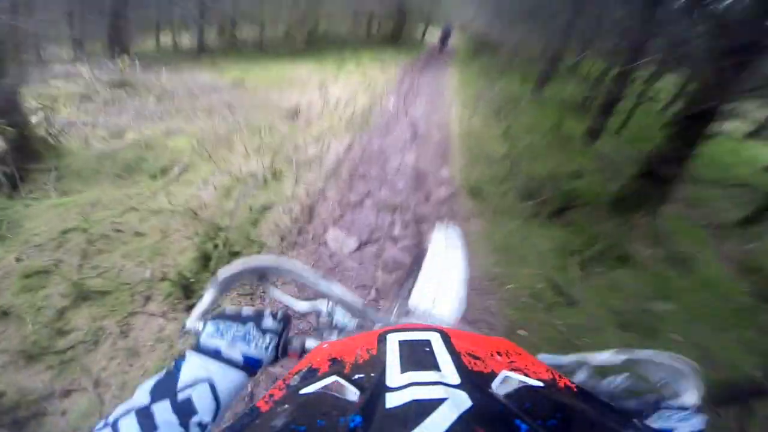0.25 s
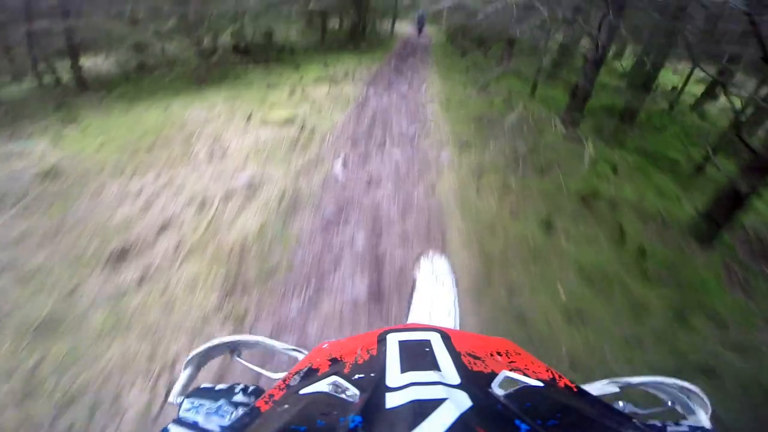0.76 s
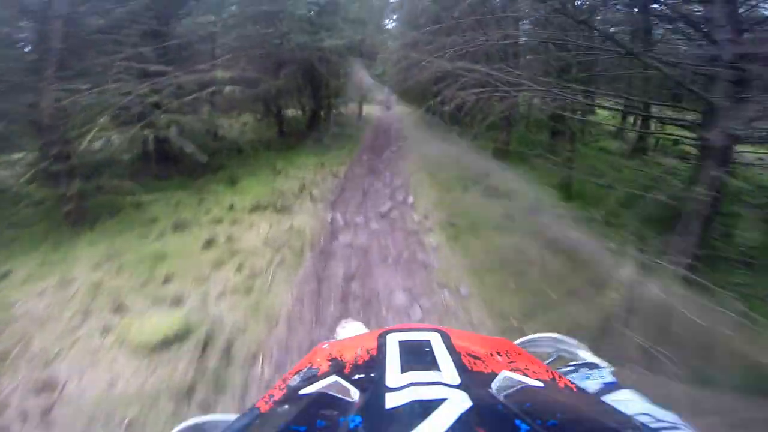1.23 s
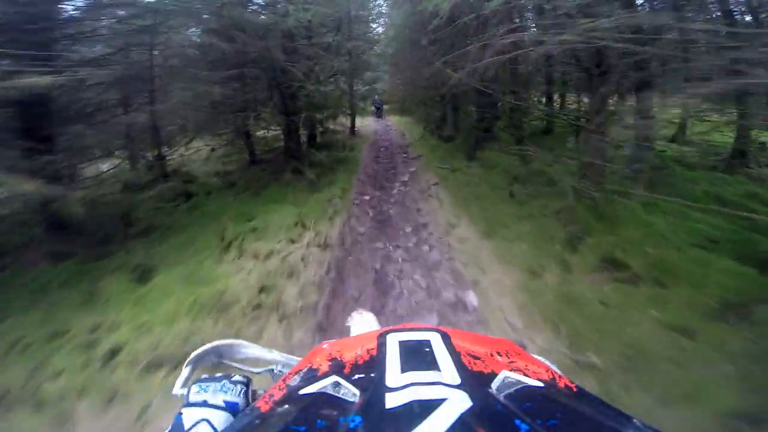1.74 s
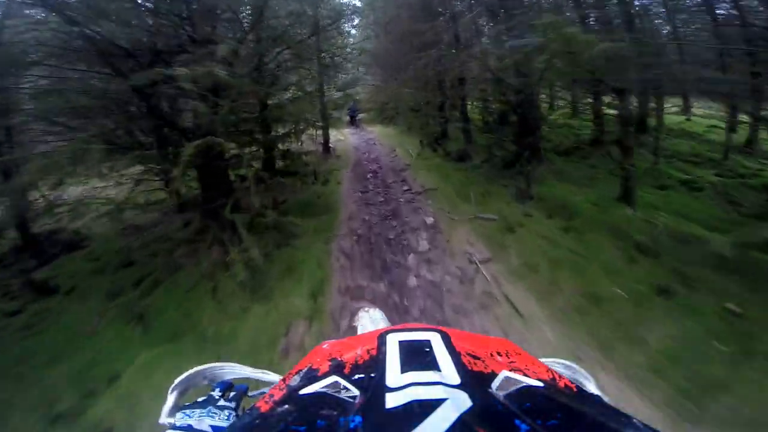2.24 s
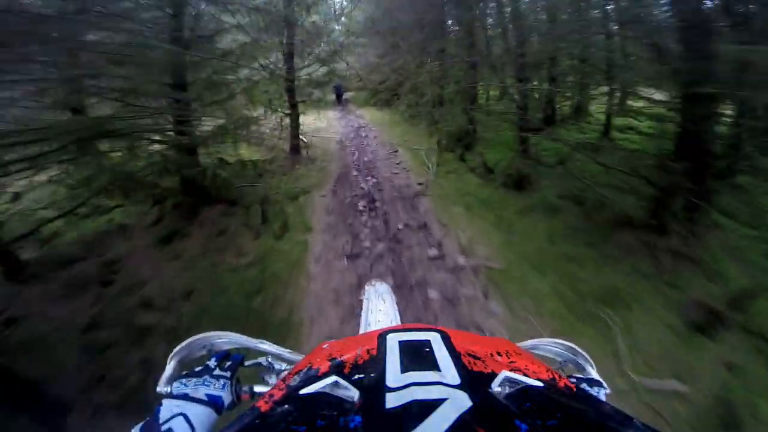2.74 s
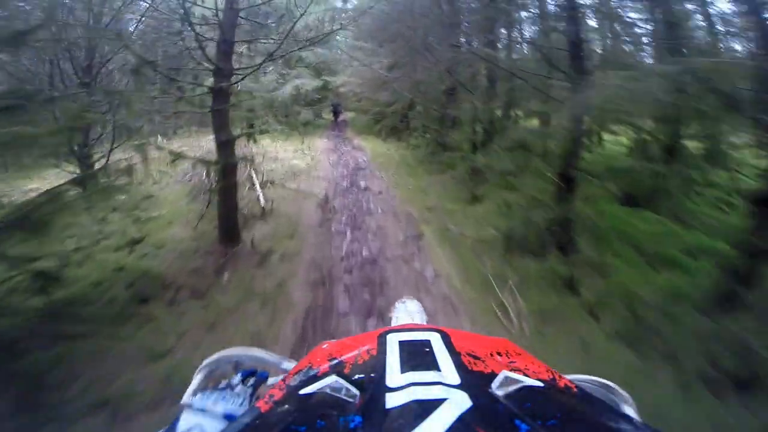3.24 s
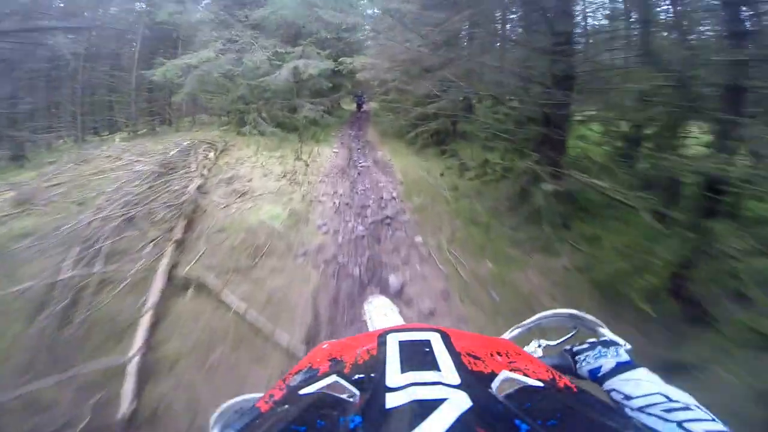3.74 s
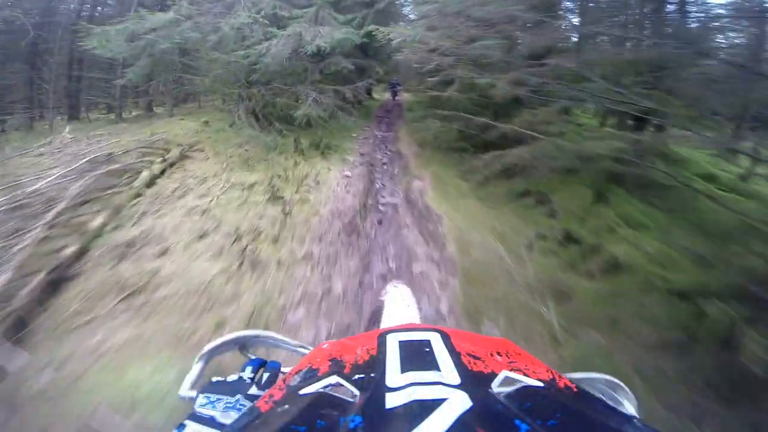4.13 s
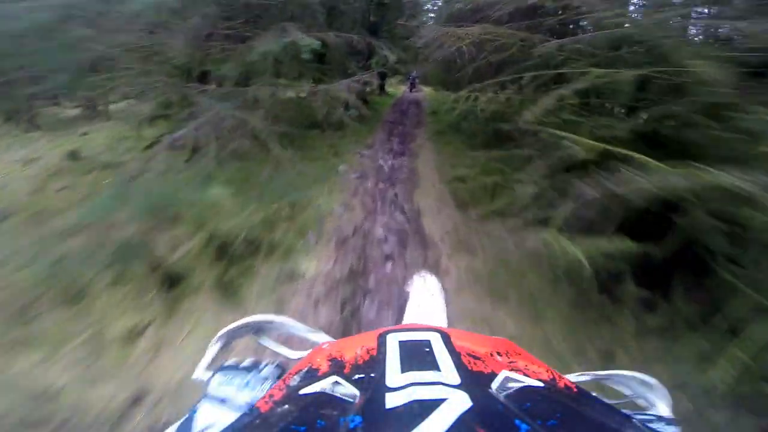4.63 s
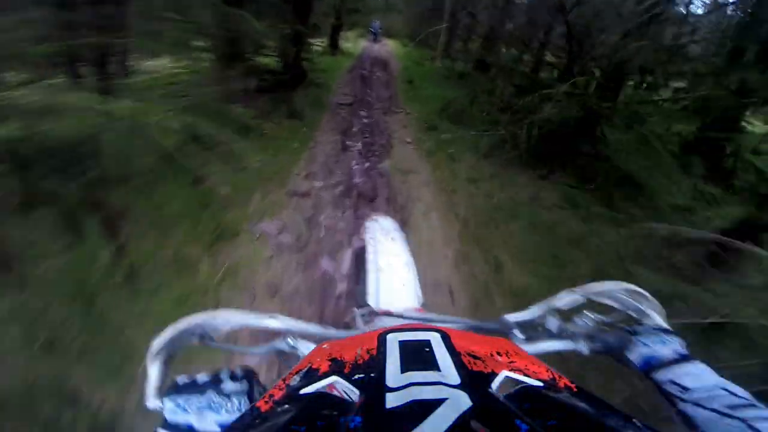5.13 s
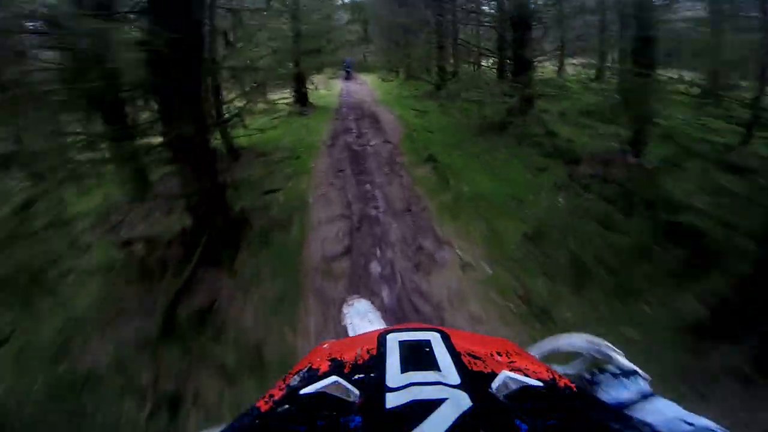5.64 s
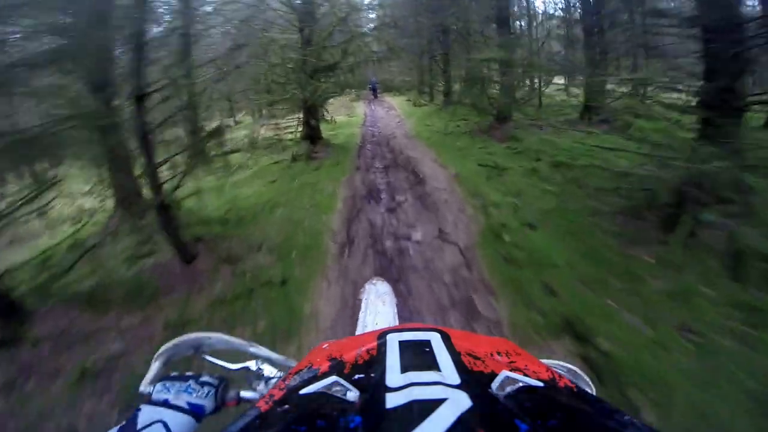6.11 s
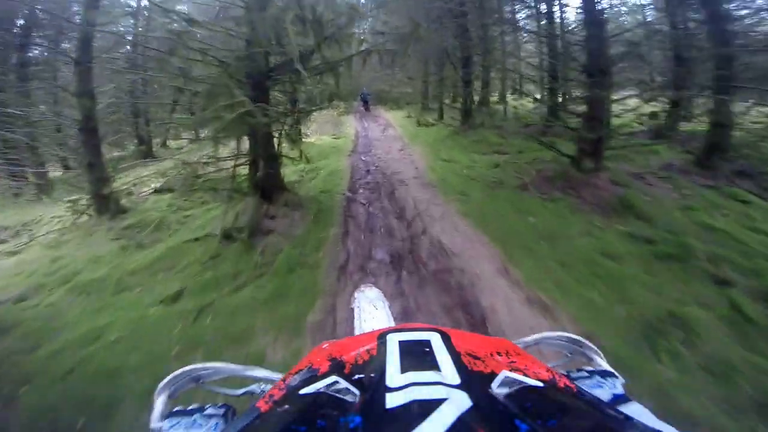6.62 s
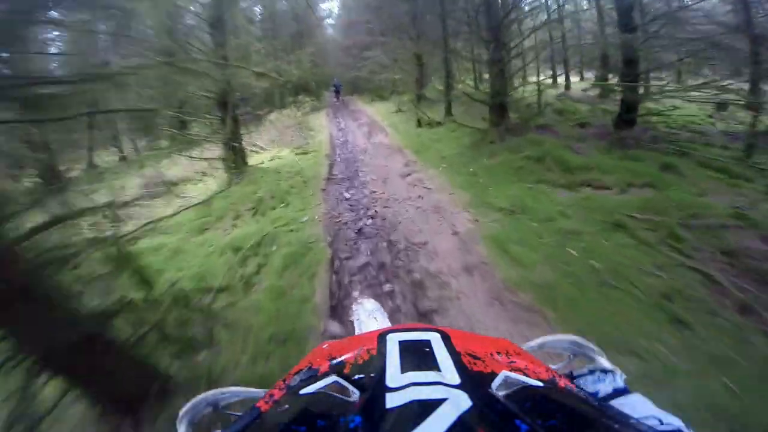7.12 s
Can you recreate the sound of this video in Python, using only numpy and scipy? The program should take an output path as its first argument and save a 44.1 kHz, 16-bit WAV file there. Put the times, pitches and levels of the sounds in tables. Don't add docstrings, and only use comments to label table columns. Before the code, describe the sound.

Muffled off-road motorbike engine surging over rough ground, air rushing, while branches whip, scrape and knock the helmet beside the microphone.

```python
import sys
import numpy as np
from scipy import signal
from scipy.fft import rfft, irfft, next_fast_len
from scipy.io import wavfile
from scipy.ndimage import uniform_filter1d, map_coordinates

SR = 44100
rng = np.random.default_rng(int(sys.argv[2]) if len(sys.argv) > 2 else 0)


def unload_wav(signal):
    wavfile.write(
        sys.argv[1],
        SR,
        np.round(np.clip(np.atleast_2d(signal).T, -1, 1) * 32767).astype(np.int16),
    )


def voltage_ratio(decibels):
    exponent = np.asarray(decibels, float) / 20
    return 10 ** exponent


N = 325017

# frequency in Hz, gain in dB.
MUFFLE = [(900, -10), (4000, -13), (16000, -76)]
COAST_FROM_S, COAST_TO_S = 4.96, 5.62


def unit(x):
    return x / np.sqrt(np.mean(x ** 2) + 1e-20)


def along(points, hz):
    f, v = np.transpose(points)
    return np.interp(np.log(hz + 1), np.log(f + 1), v)


def curves(rows):
    s, *cols = np.transpose(rows)
    return [np.interp(np.arange(N) / SR, s, c) for c in cols]


def wobble(rate_hz):
    knots = rng.standard_normal(int(N * rate_hz / SR) + 4)
    return map_coordinates(knots, [np.arange(N) * rate_hz / SR])


def swell(s, half_s):
    return np.exp(-((np.arange(N) / SR - s) / half_s) ** 2)


def filtered(x, response):
    m = next_fast_len(len(x) + 8192)
    return irfft(rfft(x, m) * response(np.fft.rfftfreq(m, 1 / SR)), m)[:len(x)]


def modes(rows):
    def response(f):
        total = 0
        for k, (c, w, db) in enumerate(rows):
            total = total + (-1) ** k * voltage_ratio(db) * 1j * f * w / (c * c - f * f + 1j * f * w)
        return total
    return response


def bumps(rows):
    return lambda f: voltage_ratio(sum(db / (1 + (2 * (f - c) / w) ** 2) for c, w, db in rows))


def beats(hz, jitter, scatter_db):
    at = np.flatnonzero(np.diff(np.floor(np.cumsum(hz) / SR)))
    luck = rng.standard_normal((N // 200, 2))[:len(at)]
    at = np.clip(at + jitter * luck[:, 0] * SR / hz[at], 0, N - 1).astype(int)
    return np.bincount(at, voltage_ratio(scatter_db * luck[:, 1]), N)


def puffs(impulses, t60_s):
    return signal.lfilter([1], [1, -voltage_ratio(-60 / (t60_s * SR))], impulses) * rng.standard_normal(N)


def crank():
    # time in seconds, firing rate in Hz.
    firing = [(0, 39.16), (.5, 42.23), (.75, 40.2), (1.0, 35.6), (1.45, 35.52), (1.78, 34.88), (2.2, 37.93),
              (2.59, 39.8), (2.87, 42.7), (3.14, 41.82), (3.6, 41.01), (4.1, 42.02), (4.7, 43.05),
              (4.95, 40.02), (5.6, 40.28), (6.02, 38.16), (6.55, 36.49), (7.3, 35.5)]
    # centre in seconds, speed change in %, half length in seconds.
    skips = [(0.118, -5, 0.068), (0.218, 1, 0.047), (1.207, 6.5, 0.14), (1.605, 6.5, 0.071),
             (2.046, 8, 0.099), (3.269, 7, 0.1), (3.466, 2, 0.072), (3.75, 10, .08), (3.962, 6.5, 0.085),
             (4.225, 2.5, 0.067), (4.532, -3.5, 0.065), (4.785, 5, 0.056), (5.184, 5.5, 0.077),
             (5.468, 4.5, 0.0893), (5.72, 5.5, 0.062), (5.868, 18.5, 0.081), (6.381, 6, .05),
             (6.64, 2.5, 0.055), (6.867, 2.5, .12), (7.028, 7, 0.058)]
    change_pct = sum(pct * swell(s, half_s) for s, pct, half_s in skips)
    return curves(firing)[0] * (1 + change_pct / 100)


def load():
    pull_db_per_hz_s = 0.049
    flare_db, flare_late_s, flare_s = 4, 0.06, 0.045
    hz_per_s = np.gradient(uniform_filter1d(crank(), SR // 20)) * SR
    return pull_db_per_hz_s * hz_per_s + flare_db * swell(COAST_TO_S + flare_late_s, flare_s)


def ride():
    # time in seconds, gain right after in dB, brief extra squeeze in dB.
    ducks = [(0, -17.5, 1.8), (0.545, -19, 3), (.645, -15, 16), (.77, -19, -5), (1.217, -20.5, -1),
             (1.34, -22, 0), (2.76, -20, -6.5), (2.86, -19, -1.5), (2.94, -18, -2), (2.96, -20.5, 4),
             (5.147, -7, 5.5), (7.196, -19.5, -1)]
    # time in seconds, throttle opening in dB.
    throttle = [(0, 2), (.13, -18), (.35, -13), (.48, -21.5), (.85, -14), (1.08, -14.5), (1.22, -3.5),
                (1.7, -11.5), (2.02, -7), (2.5, -2), (3.39, -1.5), (3.93, -6.5), (4.3, -3), (4.58, -6),
                (5.7, -6), (6.07, -13.5), (6.37, -6.5), (7.2, -7)]
    # centre in seconds, rise in dB.
    buffets = [(0, 20), (.19, 14), (.53, 24), (1.2, 12), (2.16, 1.5), (2.63, 8), (3.22, 7), (3.39, 9),
               (4.16, 9), (4.47, 9), (4.71, 7.5), (5.03, 20), (5.47, -1), (5.59, -3), (6.071, 7), (6.37, 7),
               (6.62, 6), (7.15, 11), (7.35, 10)]
    recover_db_per_s, knee_db = 18.5, 2.5
    squeeze_s, drop_s = 0.09, 0.0015
    coast_db, pull_s, buffet_half_s = -10, 0.066, 0.052
    rush_db, boom_db, bark_db, buffet_db = -32.5, -33, -32.5, -32.5
    rush_follows, boom_follows = 0.23, 0.33

    t = np.arange(N) / SR
    climbs = []
    for s, db, extra_db in ducks:
        climb_db = db + recover_db_per_s * (t - s) - extra_db * np.exp(-abs(t - s) / squeeze_s)
        climbs.append(np.where(t >= s, climb_db, np.inf))
    gain_db = -knee_db * np.logaddexp(0, -np.min(climbs, axis=0) / knee_db)
    gain_db = uniform_filter1d(gain_db, round(drop_s * SR))
    bike_db = gain_db + np.interp(t, [COAST_FROM_S, COAST_TO_S, COAST_TO_S + pull_s], [0, coast_db, 0])
    open_db, = curves(throttle)
    gust_db = sum(db * swell(s, buffet_half_s) for s, db in buffets)
    return (bike_db + rush_db + rush_follows * open_db,
            bike_db + boom_db + boom_follows * open_db,
            bike_db + bark_db + open_db,
            gain_db + buffet_db + gust_db)


def exhaust(boom_db, bark_db):
    # multiple of the firing rate, level in dB.
    orders = [(1, -21), (2, -3.5), (3, -11.5), (4, -5), (5, -4.5), (6, -1.5), (7, -3.5), (8, -14), (9, -14),
              (10, -11.5), (11, -13), (12, -10.5), (13, -15.5)]
    # frequency in Hz, width in Hz, level in dB.
    silencer = [(82, 20, -4), (170, 210, -2.5), (254, 25, 5.5), (469, 215, -7.5)]
    # frequency in Hz, width in Hz, level in dB.
    tail_pipe = [(648, 52, 3), (713, 86, 1.5), (1000, 460, -20)]
    hz = crank() * (1 + 0.006 * wobble(16))
    waver_db = np.where(np.arange(N) < 5.2 * SR, 2.2, 3.6)
    upper_db = 0.13 * (boom_db - bark_db)
    turn = 2 * np.pi * np.cumsum(hz) / SR
    lift = bumps([(249.4, 25, 5)])
    drone = 0
    for k, db in orders:
        level = voltage_ratio(db + (k > 7) * upper_db + waver_db * wobble(14))
        drone = drone + level * lift(k * hz) * np.cos(k * turn - 0.12 * k * k)

    even = beats(hz, jitter=0.005, scatter_db=1.2)
    gas = puffs(even, t60_s=0.16)
    thump = filtered(0.073 * unit(even) + unit(gas), lambda f: modes(silencer)(f) * voltage_ratio(along(MUFFLE, f)))
    boom = unit(drone) + 0.26 * unit(thump)

    def outlet(f):
        late = np.exp(-2j * np.pi * f * 0.006)
        return np.abs(modes(tail_pipe)(f)) * modes([(680, 240, 0)])(f) * voltage_ratio(along(MUFFLE, f)) * late

    bark = filtered(unit(even) + 0.36 * unit(gas), outlet)
    throb = uniform_filter1d(np.abs(unit(gas)), 150)
    return voltage_ratio(boom_db + 4.0) * unit(boom) + voltage_ratio(bark_db + 3.0) * unit(bark), throb


def rush(rush_db, throb):
    # frequency in Hz,
    # density in dB per Hz.
    rush_spectrum = [(40, -32), (70, -16), (250, -15), (400, -15), (560, -19),
                     (960, -23), (1460, -17), (1990, -22), (3260, -16), (4320, -32.5), (7000, -37), (10300, -51.5),
            (13000, -60.5), (15000, -63), (16500, -110)]
    # frequency in Hz, width in Hz, rise in dB.
    cavity = [(1510, 130, 3.5), (2425, 64, 7), (2863, 220, 4), (3350, 144, 3.5), (5570, 420, 5),
              (6700, 420, 3.5), (10030, 770, 5.5)]
    z = signal.stft(rng.standard_normal(N), nperseg=512)[2]
    patches = uniform_filter1d(uniform_filter1d(rng.standard_normal(z.shape), 6, 0), 8, 1)
    air = signal.istft(z * voltage_ratio(1.66 * unit(patches)), nperseg=512)[1][:N]
    air = unit(filtered(air, lambda f: voltage_ratio(along(rush_spectrum, f)) * bumps(cavity)(f)))
    level_db = rush_db + 4.0 + 0.81 * wobble(7) + 0.46 * wobble(60)
    return voltage_ratio(level_db) * air * (1 + 0.1 * throb)


def chain(rush_db):
    # time in seconds, tick rate in Hz, level over the rush in dB.
    tick_rows = [(0, 62.1, 2), (.3, 61.6, -9), (.5, 58.9, -6), (.9, 54.3, -6), (1.4, 48.53, -5),
                 (1.65, 48.8, -3), (1.9, 52.64, -5.5), (2.3, 56.32, -12), (4.1, 64.96, -11), (4.7, 75, -12),
                 (5.9, 51.44, -49), (6.1, 48.03, -30), (7.37, 55.06, -35)]
    hz, over_db = curves(tick_rows)
    slaps = beats(hz, jitter=0.05, scatter_db=2.5)
    ticks = unit(slaps) + 0.6 * unit(puffs(slaps, t60_s=0.012))
    guide = lambda f: modes([(1480, 380, 0)])(f) * modes([(1560, 520, 0)])(f) * voltage_ratio(along(MUFFLE, f))
    return voltage_ratio(rush_db + over_db + 2.5) * unit(filtered(ticks, guide))


def wind(buffet_db):
    # frequency in Hz, density in dB per Hz.
    lump_spectrum = [(3, -14), (12, 0), (30, -5), (42, -9), (60, -26), (110, -42), (300, -70), (1500, -120)]
    # centre in seconds, length in seconds, signed size (full scale 1).
    gust_rows = [
        (0.51, 0.026, -0.18),
        (0.533, 0.01, 0.37),
        (4.475, 0.015, -0.14),
        (5.597, .025, -0.061),
    ]
    lumps = filtered(rng.standard_normal(N), lambda f: voltage_ratio(along(lump_spectrum, f)) * (f > 2.5))
    t = np.arange(N) / SR
    gusts = sum(size * np.exp(-(2 * (t - s) / length_s) ** 2) for s, length_s, size in gust_rows)
    return voltage_ratio(uniform_filter1d(buffet_db, 900)) * unit(voltage_ratio(2.3 * wobble(4.3)) * lumps) + gusts


def twig(hz, tilt_db):
    # frequency in Hz, density in dB per Hz.
    crack_spectrum = [(200, -50), (500, -4.5), (800, -6), (2460, -3.5), (4870, -12), (7180, -16),
                      (14200, -35.5), (16500, -60)]
    # frequency in Hz, width in Hz, rise in dB.
    shell = [(950, 250, 8), (1820, 250, 4), (2450, 400, 7), (3200, 350, 6), (4150, 350, 9), (5500, 450, 9),
             (7100, 700, 6)]
    peak = modes([(hz, 0.4 * hz, 0)])
    tilt = lambda f: np.clip(tilt_db, -8, 8) * np.log2(np.maximum(f, 2000) / 2000)
    return lambda f: voltage_ratio(along(crack_spectrum, f) + tilt(f)) * bumps(shell)(f) * (0.46 + np.abs(peak(f)))


def snaps():
    # start in seconds, peak in dB, colour in Hz, tilt in dB per octave.
    blows = [(.546, 18.5, 2883, -7), (.558, 2.5, 1560, 1), (.601, -15.5, 848, 10), (0.629, -2.2, 2400, 4),
             (.64, 0.8, 1620, 1.5), (.698, -3.5, 2620, 2), (.756, -6.5, 3030, -2), (1.219, -1, 3350, -6),
             (1.226, 13.5, 2780, -6.5), (1.238, 2, 2950, 0), (1.271, 0, 860, 1.5), (1.278, 2, 900, 4.5),
             (1.301, 2.5, 1040, 1), (1.308, -2.2, 890, -1.1), (1.318, -0.5, 1830, -7),
             (1.328, 13.5, 2390, -7.5), (1.352, -7, 2410, -4), (1.366, -7, 2500, 3), (2.776, 7, 1220, 6),
             (2.786, 3, 1970, 9), (2.947, 6.5, 3060, -1), (2.955, 6.5, 2864, 2.5), (3.018, -10, 2270, -11),
             (3.277, -23, 8870, 8), (4.82, -8, 3310, -2), (5.155, -0.5, 2488, 9), (5.161, 5, 2860, 11),
             (5.17, -4, 2940, -1), (5.267, -10.5, 1560, -3), (6.875, -5, 2880, -8)]
    # start in seconds, peak in dB, colour in Hz.
    more_blows = [(0.581, -12, 1560), (.617, -9, 1500), (.709, -35, 3200), (1.361, -16, 2270), (2.81, -23, 2450),
                  (2.861, -25, 1830), (2.96, -15, 1810), (3.081, -24, 1358), (5.207, -13.5, 3070),
                  (5.232, -18.5, 5640), (5.286, -16, 5630), (5.362, -16.5, 2850)]
    shared_tilt_db, snap_t60_s = -1.5, 0.01
    ring_db, ring_grows = -32.5, 0.9
    out, t = np.zeros(N + SR), np.arange(SR // 5) / SR
    ring = (np.sin(2 * np.pi * 1825 * t) + 0.73 * np.sin(2 * np.pi * 1790 * t)) * voltage_ratio(-60 * t / 0.11)
    hold = np.minimum(1, voltage_ratio(6.0 - 60 * t / snap_t60_s)) * (1 - np.exp(-t / 0.001))
    for s, db, hz, tilt_db in blows + [(*row, shared_tilt_db) for row in more_blows]:
        grit = unit(filtered(rng.standard_normal(len(t)), twig(hz, tilt_db)))
        knock = grit + 0.94 * np.sin(2 * np.pi * hz * t)
        snap = 0.5 * voltage_ratio(db) * knock * hold
        out[round(s * SR):][:len(t)] += snap + voltage_ratio(ring_db + ring_grows * db) * ring
    return out[:N]


def thuds():
    # start in seconds, shell ring in dB, push in dB.
    knocks = [(.546, -22, 5), (.582, -14.5, -34), (.602, -11, -27), (0.617, -27, -15), (1.226, -29, 3.5),
              (1.269, -44, -34), (1.302, -41, -16), (2.776, -45, -8), (2.785, -21, -20),
              (2.947, -17.5, -1.5), (2.955, -44, -12), (3.018, -25, -51), (3.275, -36, -52),
              (5.178, -28, -21), (5.208, -20, -50), (5.232, -39, -47), (5.27, -27, -49), (5.3, -23.5, -43)]
    out, t = np.zeros(N + SR), np.arange(SR // 3) / SR
    ring = np.sin(2 * np.pi * 117 * t) * voltage_ratio(-60 * t / 0.16)
    ring = ring + 0.073 * np.sin(2 * np.pi * 255 * t) * voltage_ratio(-60 * t / 0.13)
    push = (t / 0.00037) * (1 - t / 0.0065) * np.exp(1 - t / 0.00047)
    push = push + 0.018 * np.sin(2 * np.pi * 252 * t) * voltage_ratio(-60 * t / 0.41)
    for s, ring_db, push_db in knocks:
        out[round(s * SR):][:len(t)] += voltage_ratio(ring_db) * ring + voltage_ratio(push_db) * push
    return out[:N]


def scrapes():
    # start in seconds, length in seconds, rms in dB, colour in Hz, tilt in dB per octave.
    drags = [(0.55, 0.12, -31, 1920, -5), (0.614, 0.017, -16.5, 1600, -5), (0.625, 0.045, -18.5, 2430, 0),
             (0.688, 0.022, -28, 2240, -15.5), (0.732, 0.024, -23.5, 2460, 2),
             (1.231, 0.022, -21, 2200, -3), (1.273, 0.031, -20.5, 1000, -13),
             (1.302, 0.051, -15.5, 1000, -2.5), (1.331, 0.021, -28, 2420, -7),
             (1.353, 0.023, -24.5, 2170, -1), (2.786, .08, -42, 2566, 1), (2.959, 0.014, -23.5, 2980, 8),
             (3.025, 0.078, -39.5, 2500, -10), (3.281, 0.017, -37, 3960, 12.5),
             (5.172, 0.016, -17, 1270, -2), (5.253, 0.032, -29, 1600, -1.5)]
    out, clumps = np.zeros(N + SR), voltage_ratio(1.8 * wobble(500))
    for s, length_s, db, hz, tilt_db in drags:
        u = np.arange(SR // 8) / SR / length_s
        grit = unit(filtered(rng.standard_normal(len(u)), twig(hz, tilt_db)))
        out[round(s * SR):][:len(u)] += voltage_ratio(db) * grit * np.clip(8 * u, 0, 1) * np.clip(1.42 * (1 - u), 0, 1)
    return out[:N] * clumps


def visor():
    # start in seconds, peak in dB, first swing in Hz, t60 in seconds, ring in dB, crack in dB.
    hits = [
        (5.1751, -6, 1251, 0.014, -13, 0),
        (6.8742, -7, 1570, 0.012, -36, -6),
        (7.2104, 13, 1760, 0.0097, -28.5, -10),
    ]
    out, t = np.zeros(N + SR), np.arange(SR // 5) / SR
    for s, db, hz, t60_s, ring_db, crack_db in hits:
        crack = voltage_ratio(crack_db) * unit(filtered(rng.standard_normal(len(t)), twig(1.4 * hz, -1)))
        swing = (np.sin(2 * np.pi * hz * t) + crack) * voltage_ratio(-60 * t / t60_s) * (1 - np.exp(-t / 0.00052))
        ring = voltage_ratio(ring_db - 60 * t / 0.11) * np.sin(2 * np.pi * 1825 * t)
        out[round(s * SR):][:len(t)] += voltage_ratio(db) * (swing + ring)
    return out[:N]


def scene():
    rush_db, boom_db, bark_db, buffet_db = ride()
    load_db = load()
    pipe, throb = exhaust(boom_db + load_db, bark_db + load_db)
    bike = pipe + rush(rush_db, throb) + chain(rush_db)
    twigs = snaps() + thuds() + scrapes() + visor()
    return (bike + wind(buffet_db) + twigs)[None]


def roll_off(x):
    return signal.sosfilt(signal.butter(12, 16620, fs=SR, output="sos"), x)


def record(dry):
    clipped = dry[0] / (1 + np.abs(dry[0]) ** 10) ** (1 / 10)
    treble_cut = [(12000, -1), (15000, -4.5), (16600, -20), (16800, -80)]  # Hz, dB
    mix = filtered(clipped, lambda f: voltage_ratio(along(treble_cut, f)))
    return roll_off(mix[None])


dry = scene()
out = record(dry)
unload_wav(out)
```